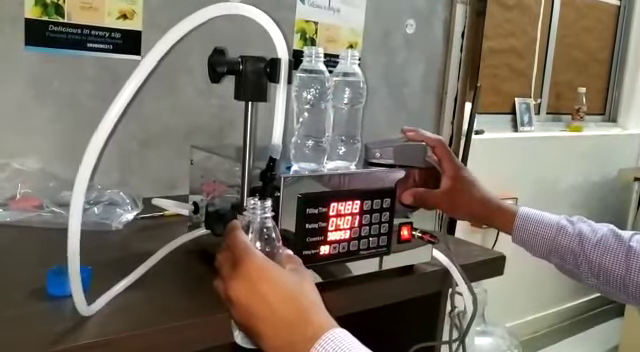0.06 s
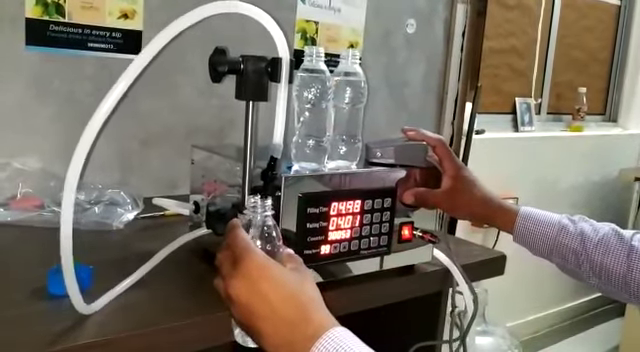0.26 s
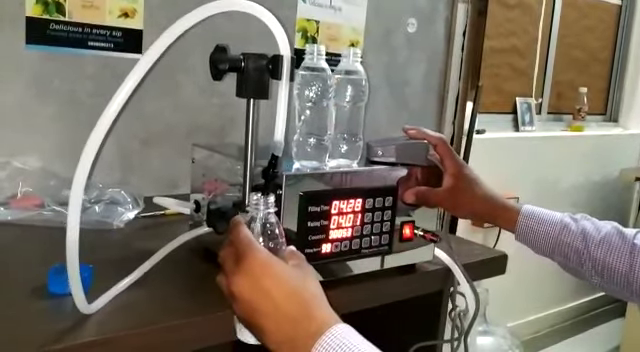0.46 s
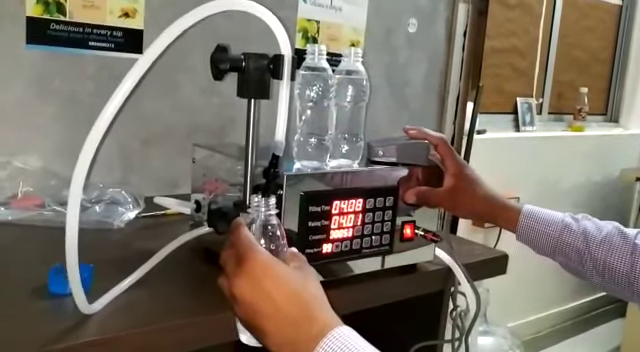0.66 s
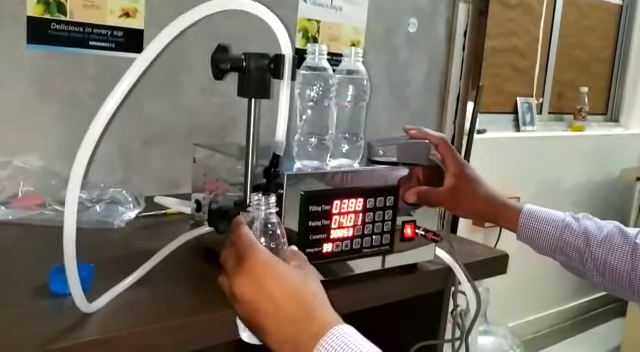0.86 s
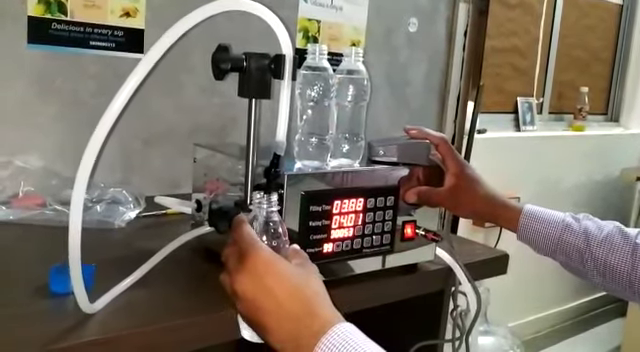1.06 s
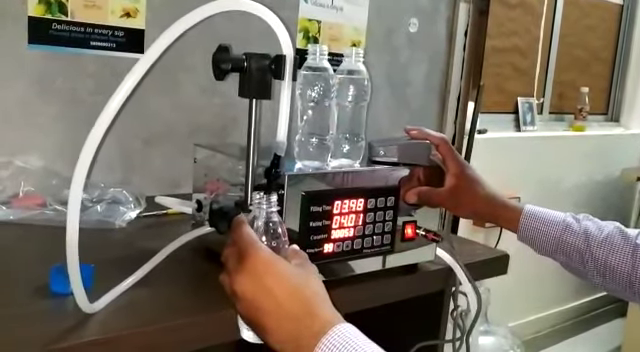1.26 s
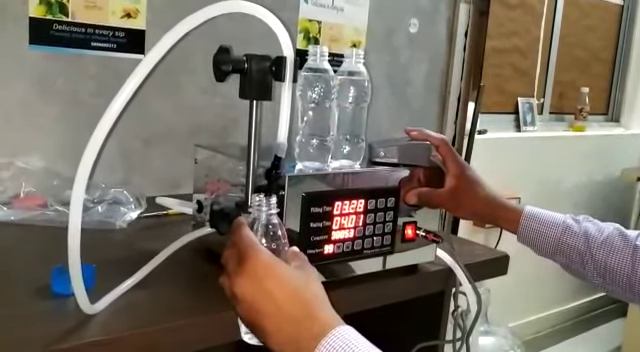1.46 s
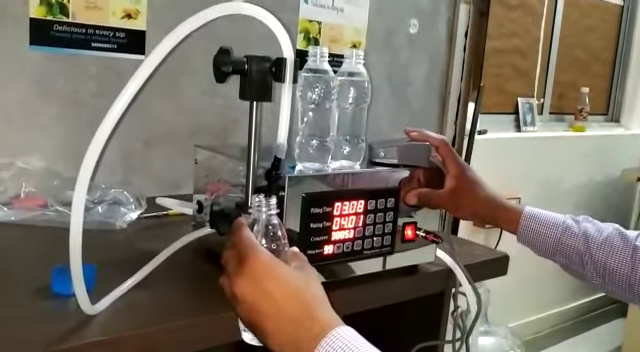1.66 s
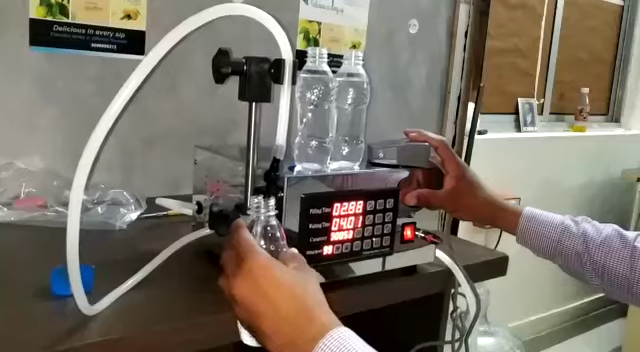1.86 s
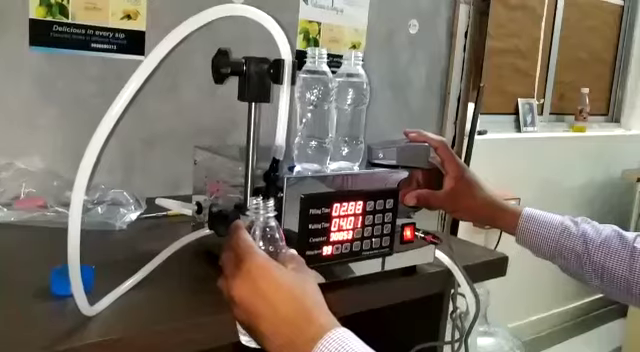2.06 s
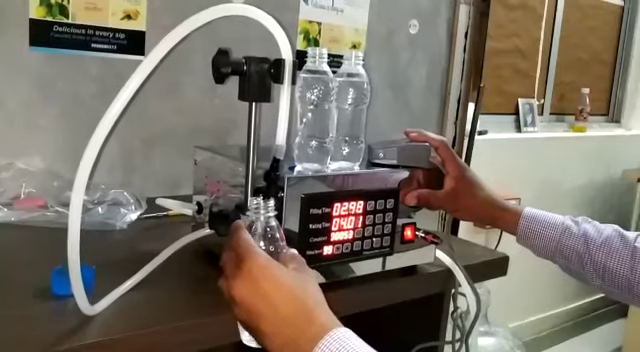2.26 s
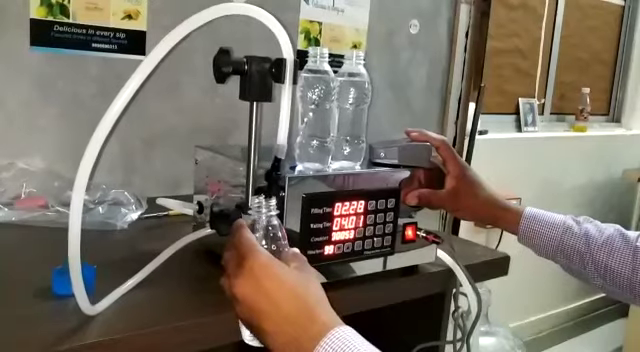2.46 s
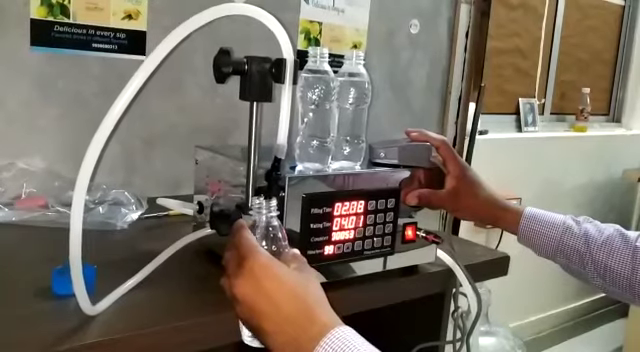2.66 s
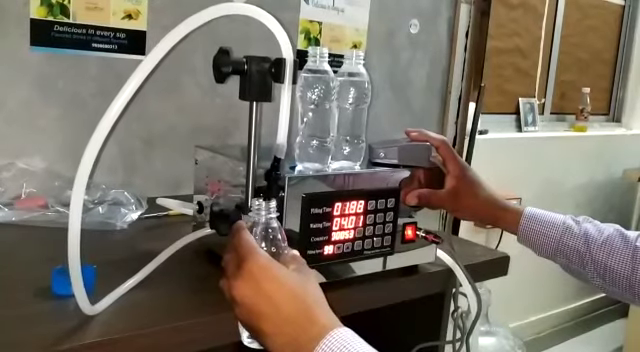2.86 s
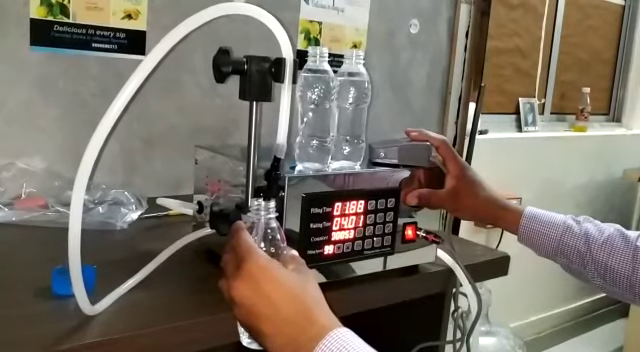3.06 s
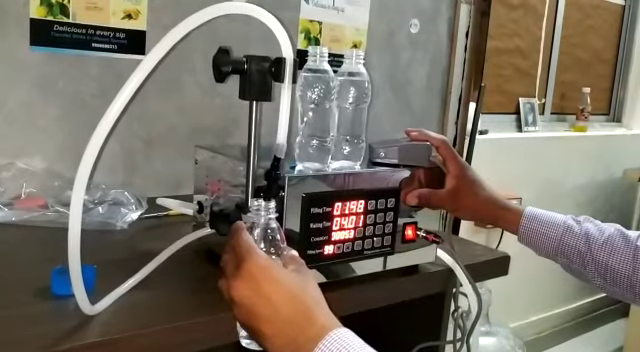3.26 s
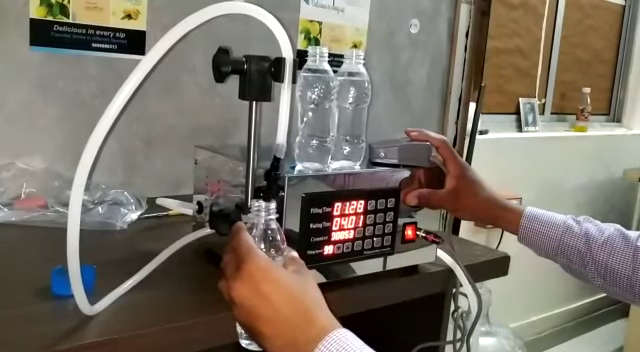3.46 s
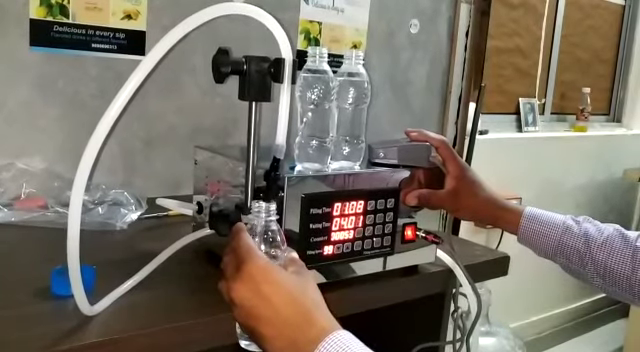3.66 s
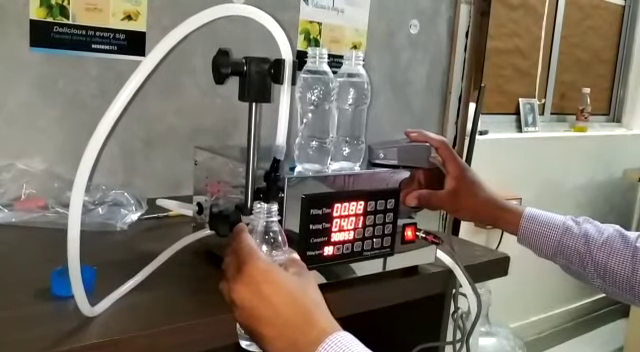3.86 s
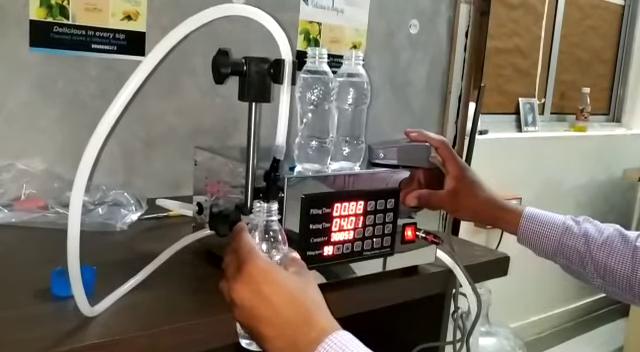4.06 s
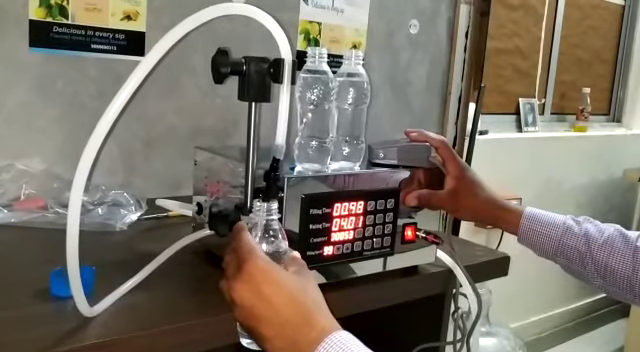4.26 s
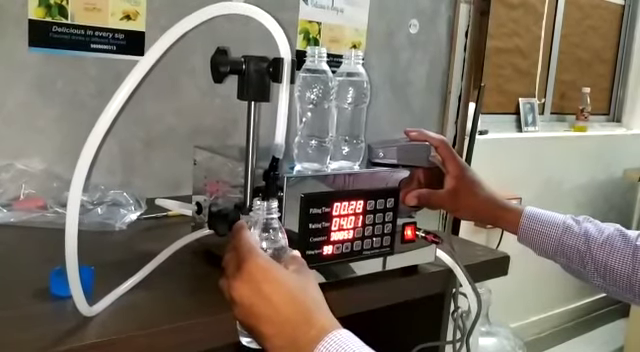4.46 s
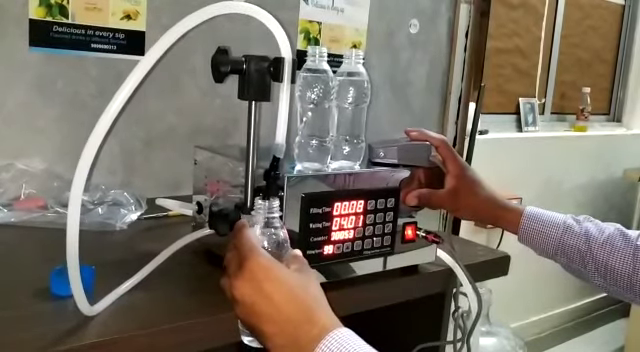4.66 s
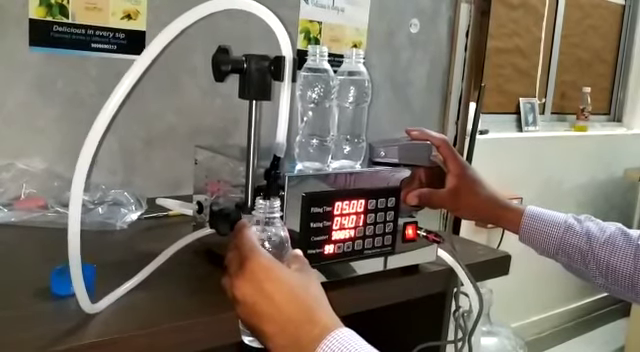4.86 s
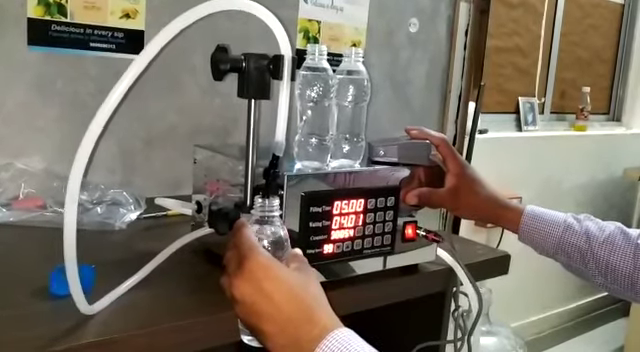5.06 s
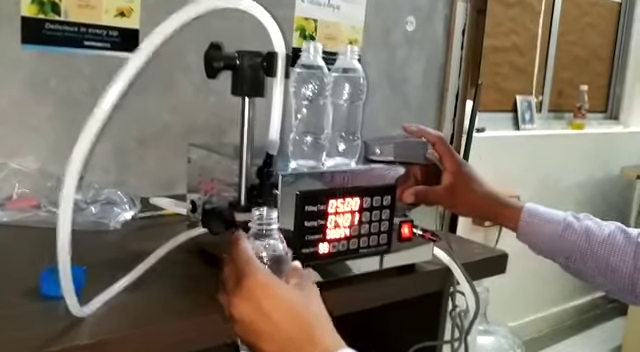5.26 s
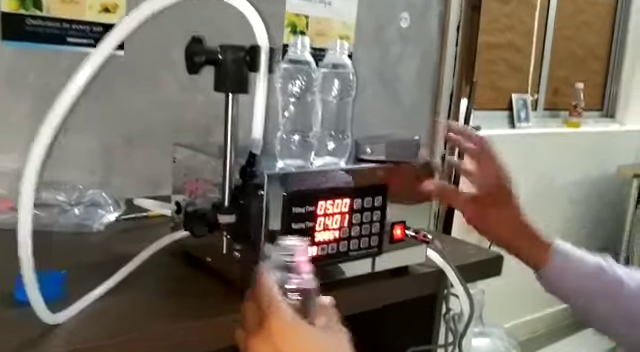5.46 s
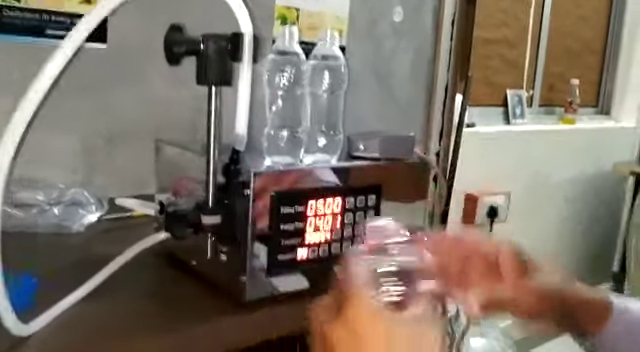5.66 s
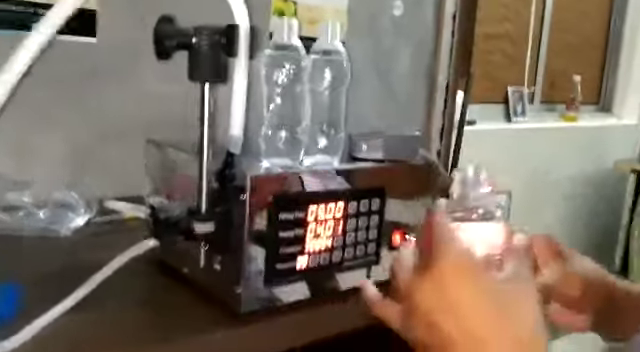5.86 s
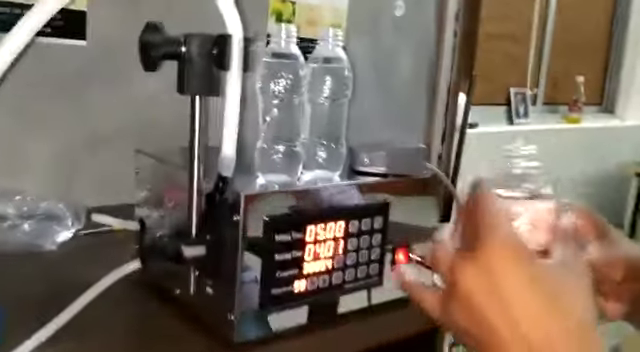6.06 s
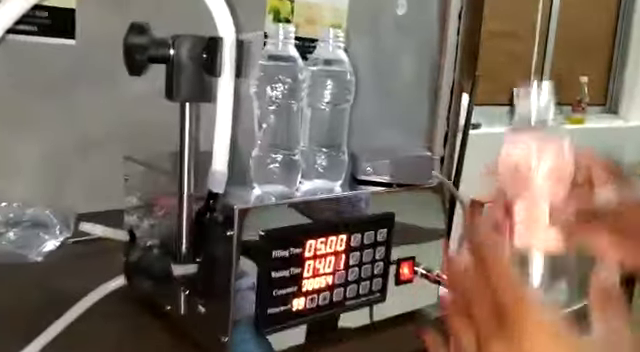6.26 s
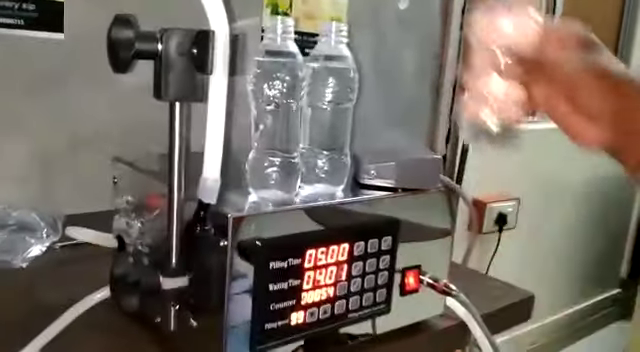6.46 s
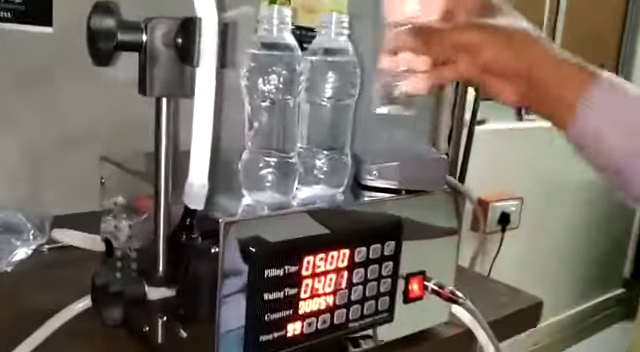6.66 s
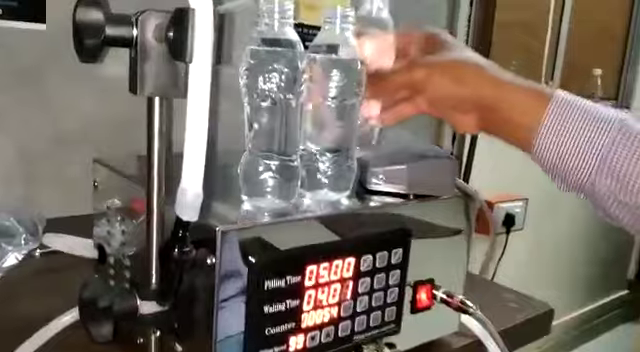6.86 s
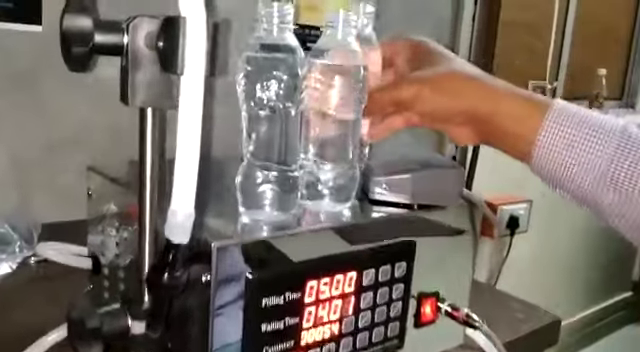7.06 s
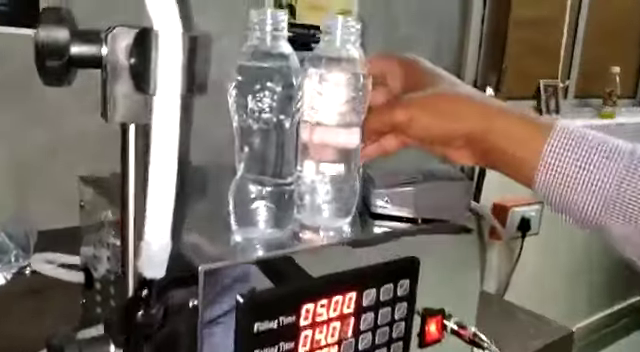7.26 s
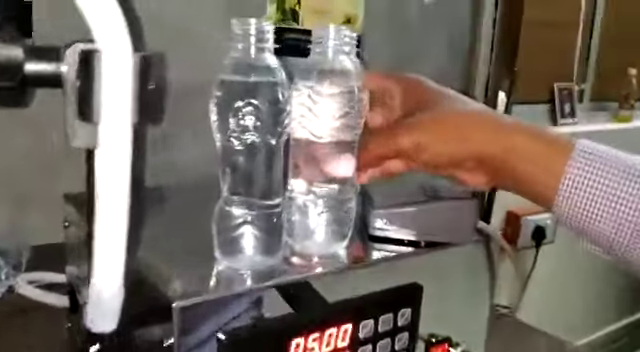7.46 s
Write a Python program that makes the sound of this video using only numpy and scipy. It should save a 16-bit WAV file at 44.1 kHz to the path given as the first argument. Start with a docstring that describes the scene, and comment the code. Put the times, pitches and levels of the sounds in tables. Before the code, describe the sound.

A benchtop filling machine starts at once with a brief shudder in a small hard room. Its pump motor holds a steady buzzing hum, with a bright hiss and a thin electronic whine. Liquid patters into a plastic bottle, the fine drops clearest in the first two seconds, while a faint hollow gurgle climbs in pitch as the bottle fills. At about 4.9 seconds the pump surges slightly and cuts out, the case shudders and the last drops fall. A low room drone and soft hiss remain, with faint handling of the bottle. At 6.9 seconds the full bottle taps the steel case with a sharp plastic snap. Around 7.3 seconds it is set down with a quick cluster of knocks, a short metallic ring and a dull thud from the bench. The hand-held microphone rumbles and bumps softly around 2.5 to 2.8, 5.5 and 6 seconds.

```python
"""A small hard room, where a benchtop filling machine pumps liquid into a plastic bottle for five seconds.
The motor hums and buzzes at harmonics of its shaft rate, with a hiss and a thin electronic whine.
Drops patter, and the bottle's air resonance climbs as the air volume shrinks. The pump stops; the full
bottle is tapped against the steel case and set down on it, exciting the modes of case and bench.
Beneath it all lie the drone of the room and the rumble of a hand-held microphone."""
import sys
import numpy as np
from scipy import signal
from scipy.fft import rfft, irfft
from scipy.io import wavfile

SR = 44100
rng = np.random.default_rng(int(sys.argv[2]) if len(sys.argv) > 2 else 0)


def int16_out(signal):
    """Quantize to a 16-bit WAV file."""
    q = np.round(np.clip(np.atleast_2d(signal).T, -1, 1) * 32767)
    wavfile.write(sys.argv[1], SR, q.astype(np.int16))


N = 331632
TIME = np.arange(N) / SR
STOP_S, FLOW_END_S = 4.87, 4.92  # the drive cuts out, then the stream dries up

# The motor's run. Each row: time in seconds, shaft turns per second, running level in dB.
MOTOR_RUN = [(0, 50, -16), (.07, 57, -12), (.13, 59.25, -1), (.45, 59.15, 0), (1.3, 59.2, 0),
             (2.8, 59.27, 0), (4.68, 59.3, 0), (4.83, 59.1, -1), (4.9, 58.9, -7), (5.05, 58.8, -13),
             (5.25, 58, -45), (5.3, 58, -100)]
# Low shaft harmonics. Each row: multiple of the shaft rate, level in dB, growth in dB per second.
HUM_ORDERS = [(1, -55, 0), (2, -46.5, -0.34), (3, -39.5, -0.88), (5, -49.5, 0), (6, -46, 0.3)]
# The motor's stepping tones. Each row: multiple of the shaft rate, start in seconds, start of the fade
# in seconds, level in dB, growth in dB per second, fade in dB per second, sway in dB.
STEP_TONES = [(4, 0.07, 4.85, -36, 0.23, 53, 0.4), (8, 0.073, 4.63, -40.5, 1.11, 53, 0.8)]
# Shaft harmonics that the sheet metal radiates well. Each row: frequency in Hz, level in dB.
PANEL_TONES = [(651.4, -58.5), (710.6, -53), (769.8, -55.5), (829.0, -51), (888.2, -53), (947.5, -52.5),
               (1303, -64), (1421, -57.5), (1480, -60.5), (1599, -57), (1776, -59), (1836, -60.5),
               (2013, -64), (2250, -58), (3203, -66.5), (3316, -64), (3381, -67), (4210, -65.5),
               (4328, -64.5), (4447, -72), (4506, -67.5), (5098, -66.5), (5868, -66), (5927, -68),
               (5986, -64.5), (6815, -63)]
# Envelope of the weaker shaft harmonics. Each row: frequency in Hz, relative level in dB.
COMB_SPECTRUM = [(550, -14), (1100, -4), (1500, 7), (2200, -10), (2700, -7), (3300, -10.5), (4400, -1.5),
                 (5200, -5), (5900, -4), (7200, -9), (8200, -18)]
# Hiss of the drive. Each row: frequency in Hz, relative spectral density in dB.
HISS_SPECTRUM = [(2000, 1.5), (3300, 1), (4400, 2.5), (5000, 1.5), (5900, 3.5), (8400, 1.5), (10800, 4),
                 (12000, 0.5), (13400, 5.5), (14200, 0), (14950, 8.5), (15600, -5.5)]
# Churn of the pump head and tube. Each row: frequency in Hz, relative spectral density in dB.
CHURN_SPECTRUM = [(100, -7), (220, -4.5), (400, -2.5), (600, -7.5), (900, -6.5), (1150, -14), (2200, -12.5),
                  (2800, -25.5), (5000, -35)]
# Whine of the electronics. Each row: time in seconds, rms level in dB.
WHINE_LEVEL = [(0, -65), (.45, -57), (1.8, -61.5), (2.05, -69), (2.33, -66), (2.45, -58.5), (4.8, -56)]
# Case shudders. Each row: centre time in seconds, peak level in dB, frequency in Hz, length in seconds.
CASE_SHUDDERS = [(.055, -29.5, 284.5, .11), (4.859, -33.5, 260.5, .09), (4.956, -36, 281, 0.14),
                 (4.99, -39, 177.4, .28), (5.061, -40.5, 113, .3)]
# How strongly the stream stirs the bottle's air. Each row: time in seconds, level in dB.
GURGLE_LEVEL = [(0, -42), (.6, -55), (2.0, -58), (2.9, -46.5), (3.6, -45), (4.0, -49.5), (4.33, -45),
                (4.6, -52), (4.85, -51)]
# The larger drops. Each row: start in seconds, level in dB, centre frequency in Hz.
LARGE_DROPS = [(.197, -37, 10500), (.405, -37, 5400), (.425, -41, 4630), (.538, -35, 9400),
               (0.819, -35, 5960), (.84, -34, 10000), (.93, -33, 10500), (1.14, -39, 3780),
               (1.262, -39.5, 3700), (1.641, -30, 10300), (2.091, -38, 6030), (2.145, -38, 4800),
               (2.243, -35, 10900), (3.51, -36, 10200), (4.359, -34, 12530), (4.825, -39.5, 10800),
               (4.874, -28, 11200), (4.88, -34, 8360), (4.92, -37, 1440), (4.978, -41.5, 4740),
               (4.981, -42, 10500)]
# The bottle is handled, then meets steel. Each row: start in seconds, then gains in dB of the plastic
# snap, the body, the case ring and the bench thud.
BOTTLE_KNOCKS = [(5.805, -29, -60, -70, -70), (6.352, -35, -60, -70, -65), (6.9275, -3.5, -2.5, -13, -49),
                 (7.103, -32, -42, -44, -40), (7.2948, -19, -7, -6.5, -37), (7.3008, -21, -15, -17, -45),
                 (7.307, -18, -6, -13, -50), (7.327, -25, -19, -23, -28), (7.341, -30, -22, -22, -50),
                 (7.3657, -50, -26, -28, -23), (7.467, -41, -41, -45, -35)]
# Bright snap of the plastic. Each row: frequency in Hz, relative level in dB.
SNAP_SPECTRUM = [(800, -5), (2800, -9), (3500, -7), (4300, 2), (5000, -0.5), (5700, -4), (6500, -4),
                 (8500, -4), (11500, 1), (13000, -2), (14800, 1.5), (16000, 1)]
# Dull body of a knock. Each row: frequency in Hz, relative level in dB.
BODY_SPECTRUM = [(80, -24), (250, 10.5), (450, -2), (650, 4), (850, 0), (1700, -5.5), (2300, -8),
                 (3200, -19.5), (8000, -28)]
# Modes of the steel case. Each row: frequency in Hz, level in dB, 60 dB decay time in seconds.
CASE_MODES = [(266, -23, 0.19), (432, -31, 0.16), (844, -38, 0.31), (1222, -31, 0.11), (1660, -35, 0.11),
              (2200, -41, .15)]
# Modes of the bench. Each row: frequency in Hz, level in dB, 60 dB decay time in seconds.
BENCH_MODES = [(80, -4, 0.29), (135, -7, 0.065), (201, -6, 0.13)]
# Reverberation of the room. Each row: frequency in Hz, 60 dB decay time in seconds.
REVERB_TIMES = [(200, 0.69), (1000, 0.36), (4000, 0.52), (9000, 0.58), (15000, 0.2)]
# Shifts of the grip on the microphone. Each row: start in seconds, length in seconds, relative level in dB.
GRIP_SHIFTS = [(0, .14, -40), (2.51, 0.33, -33), (5.24, .26, -43), (5.94, .5, -39), (6.58, 0.6, -41),
               (7.32, .2, -38)]
# Soft bumps on the microphone. Each row: start in seconds, peak level in dB.
HAND_BUMPS = [(2.53, -27), (2.825, -28), (5.456, -24), (6.022, -26)]
# Rumble of the hand. Each row: frequency in Hz, relative spectral density in dB.
RUMBLE_SPECTRUM = [(10, -21), (30, 5), (60, 1), (90, -5.5), (130, -5), (250, -26), (600, -70)]
# Low drone of the room. Each row: frequency in Hz, relative spectral density in dB.
DRONE_SPECTRUM = [(50, -16), (85, -5), (141, -7.5), (157, -7.5), (178, 3.5), (200, -3), (233, -2.5),
                  (295, -5), (415, -0.5), (482, -9.5), (860, -8), (1100, -12.5), (1430, -39), (2420, -120)]
# Soft hiss of the room. Each row: frequency in Hz, relative spectral density in dB.
AIR_SPECTRUM = [(650, -30), (1100, 2.5), (1240, 7), (1600, 3.5), (1920, 3.5), (2420, 1), (2750, -4),
                (3500, -7.5), (4400, -9.5), (5600, -14), (8000, -16), (12000, -20), (15700, -26)]


def shaft_harmonic(angle, order, dispersion_rad=1.3):
    """Dispersion: the mounting gives each multiple of the shaft rate its own phase; rms 1."""
    return np.sqrt(2) * np.sin(order * angle + dispersion_rad * order ** 2)


def motor_hum(angle, sway_db=0.56, sway_hz=5.4):
    """Forced vibration at low harmonics of the shaft rate, swaying with the load."""
    tones = sum(amp(db + growth * TIME + sway_db * drift(sway_hz)) * shaft_harmonic(angle, order)
                for order, db, growth in HUM_ORDERS)
    return amp(curve(MOTOR_RUN, column=2)) * tones


def motor_steps(angle, attack_s=0.044, settle_s=1.4, sway_hz=5.4):
    """Periodic stepping forces give two tones, whose sway lessens as the flow steadies."""
    unsteadiness = 0.5 + np.exp(-TIME / settle_s)
    out = np.zeros(N)
    for order, start, end, db, growth, fade, sway_db in STEP_TONES:
        level_db = db + growth * TIME - fade * since(end) + sway_db * unsteadiness * drift(sway_hz)
        out += ramp(start, attack_s) * amp(level_db) * shaft_harmonic(angle, order)
    return out


def panel_buzz(angle, tones_db=-1, comb_db=-54, scatter_db=3, flutter=0.17):
    """Radiation from sheet metal: some high shaft harmonics stand out of a fine, uneven comb."""
    shaft_hz = np.median(curve(MOTOR_RUN))
    strong = [round(hz / shaft_hz) for hz, _ in PANEL_TONES]
    tones = np.zeros(N)
    for order, (_, db) in zip(strong, PANEL_TONES):
        gain = np.sqrt(2) * amp(db + tones_db) * (1 + flutter * drift(3.4))
        tones += gain * np.sin(order * angle + 2 * np.pi * rng.random())
    # the comb is the waveform of one shaft turn, repeated
    orders = np.arange(9, 138)
    strengths = np.zeros(2049)
    uneven_db = scatter_db * rng.standard_normal(len(orders))
    strengths[orders] = amp(at_hz(COMB_SPECTRUM, orders * shaft_hz) + uneven_db)
    strengths[strong] = 0
    one_turn = unit(irfft(strengths * np.exp(2j * np.pi * rng.random(len(strengths)))))
    comb = np.interp(angle / (2 * np.pi) % 1, np.linspace(0, 1, len(one_turn)), one_turn)
    return amp(curve(MOTOR_RUN, column=2)) * (tones + amp(comb_db) * comb)


def pump_effort(ease_db_per_s=0.31, surge_db=4, surge_s=0.08, cut_db=9, run_down_db_per_s=130):
    """Gain under load: the pump eases slowly, labours just before it stops, then runs down."""
    surge = surge_db * np.exp(np.minimum(TIME - STOP_S, 0) / surge_s)
    stopping = cut_db * ramp(STOP_S, 0.028) + run_down_db_per_s * since(STOP_S)
    return amp(surge - stopping - ease_db_per_s * TIME)


def pump_noise(angle, hiss_db=-45.5, churn_db=-43.5, throb=0.2, flicker_db=1.0):
    """Amplitude modulation: the drive's hiss throbs once a turn, over the churn of the pump head."""
    hiss = amp(hiss_db + flicker_db * drift(45)) * noise(HISS_SPECTRUM) * (1 + throb * np.cos(angle))
    churn = amp(churn_db) * noise(CHURN_SPECTRUM)
    return pump_effort() * (hiss + churn)


def electronic_whine(hz=7784, wander_rad=0.75, fade_s=0.056):
    """Phase modulation slightly blurs the thin tone of the motor's electronics."""
    powered = np.clip((STOP_S - TIME) / fade_s, 0, 1)
    phase = 2 * np.pi * hz * TIME + wander_rad * drift(8.8)
    return powered * np.sqrt(2) * amp(curve(WHINE_LEVEL)) * np.sin(phase)


def case_shudders():
    """Resonance: modes of the case swell briefly as the motor starts and stops."""
    out = np.zeros(N)
    for centre, db, hz, length in CASE_SHUDDERS:
        t = np.arange(0, length, 1 / SR)
        add(out, centre - length / 2, amp(db) * np.hanning(len(t)) * np.sin(2 * np.pi * hz * t))
    return out


def flow(fade_db_per_s=190):
    """Gain of the stream: steady, then an exponential decay just after the pump stops."""
    return amp(-fade_db_per_s * since(FLOW_END_S))


def bottle_air(empty_hz=364, brim_s=5.26, width_hz=85, gurgle_db=3):
    """Helmholtz resonance: the stream stirs the bottle's air; pitch goes as one over root volume."""
    air_left = 1 - np.minimum(TIME, FLOW_END_S) / brim_s
    carrier = np.exp(2j * np.pi * np.cumsum(empty_hz / np.sqrt(air_left)) / SR)
    pole = np.exp(-np.pi * width_hz / SR)
    stirring = rng.standard_normal(N) * amp(gurgle_db * drift(14))
    # shift down, low-pass, shift back: a resonator that follows the note
    note = (carrier * signal.lfilter([1], np.poly([pole, pole]), stirring / carrier)).real
    return flow() * amp(curve(GURGLE_LEVEL)) * unit(note)


def splash(hz, decay_cycles=17):
    """A drop's impact: a band of noise around hz, decaying exponentially."""
    t = np.arange(SR // 50) / SR
    band = [(hz / 2, -20), (hz, 0), (hz * 2, -20), (hz * 4, -45)]
    return np.exp(-t * hz / decay_cycles) * colour(rng.standard_normal(len(t)), band)


def stream_patter(drops_per_s=220, spread_db=3, pitches=24, spatter_db=-60.5, bare_db=7.5, bare_s=1.7):
    """Shot noise: fine droplets strike plastic and liquid at random, among some larger drops."""
    sizes = amp(spread_db * np.minimum(rng.exponential(1, N), 4))
    impacts = sizes * (rng.random(N) < drops_per_s / SR)
    pitch_index = rng.integers(0, pitches, N)
    spatter = sum(signal.oaconvolve(impacts * (pitch_index == k), splash(hz))[:N]
                  for k, hz in enumerate(np.geomspace(3600, 14500, pitches)))
    boost_db = bare_db * np.exp(-(TIME / bare_s) ** 2)  # louder until liquid covers the bottom
    out = flow() * amp(spatter_db + boost_db) * unit(spatter)
    for start, db, hz in LARGE_DROPS:
        add(out, start, amp(db) * splash(hz))
    return reverberate(out, wet_db=-3)


def bottle_knocks():
    """Impact excitation: the plastic snaps, the case rings, the bottle's weight thuds into the bench."""
    t, out = np.arange(SR // 2) / SR, np.zeros(N)
    for start, snap_db, body_db, case_db, thud_db in BOTTLE_KNOCKS:
        snap = amp(snap_db) * contact(SNAP_SPECTRUM, decay_s=0.0033, wet_db=-4.5)
        body = amp(body_db) * contact(BODY_SPECTRUM, decay_s=0.016, wet_db=6)
        case = amp(case_db) * ring(CASE_MODES, t)
        thud = amp(thud_db) * ring(BENCH_MODES, t)
        add(out, start, snap + body + case + thud)
    return out


def contact(spectrum, decay_s, wet_db):
    """A brief contact is broadband: a crack and its echoes, filtered together; energy 1."""
    t = np.arange(SR // 2) / SR
    crack = rng.standard_normal(len(t)) * np.exp(-t / decay_s)
    echoing = crack / np.linalg.norm(crack) + amp(wet_db) * reflections()
    sound = colour(np.pad(echoing, (0, len(t))), spectrum)[:len(t)]
    return sound / np.linalg.norm(sound)


def ring(modes, t):
    """Free vibration: a sum of damped modes."""
    return sum(amp(db - 60 * t / t60) * np.sin(2 * np.pi * hz * t) for hz, db, t60 in modes)


def reflections(early_gain=2, early_s=0.0098):
    """Impulse response: echoes from bench and wall, then a tail whose top treble dies first; energy 1."""
    hz, t, bands = signal.stft(rng.standard_normal(SR // 2), SR, nperseg=256)
    decay = amp(-60 * t / at_hz(REVERB_TIMES, hz)[:, None]) + early_gain * np.exp(-t / early_s)
    tail = signal.istft(bands * decay, SR, nperseg=256)[1][:SR // 2]
    tail[:SR // 500] = 0  # the first echo takes 2 ms
    return tail / np.linalg.norm(tail)


def reverberate(x, wet_db):
    """Convolution adds the room's reflections to the direct sound."""
    return x + amp(wet_db) * signal.fftconvolve(x, reflections())[:N]


def handling(rumble_db=-52, lumps_db=2, rise_s=0.025, fall_s=0.094, bump_hz=55.6, bump_decay_s=0.0062):
    """Structure-borne sound of the hand: a lumpy rumble that swells as the grip shifts, and soft bumps."""
    gain = amp(rumble_db)
    for start, length, db in GRIP_SHIFTS:
        gain = gain + amp(db) / 2 * ramp(start, rise_s) * np.exp(-since(start + length) / fall_s)
    out = gain * unit(amp(lumps_db * drift(7.6)) * noise(RUMBLE_SPECTRUM))
    t = np.arange(SR // 10) / SR
    bump = np.sin(2 * np.pi * bump_hz * t) * np.exp(-t / bump_decay_s)
    for start, db in HAND_BUMPS:
        add(out, start, amp(db) * bump / bump.max())
    return out


def room_tone(drone_db=-39.5, air_db=-47.0, swell_db=0.7):
    """Ambient noise: a low drone and a soft, gently swelling hiss."""
    drone = amp(drone_db) * noise(DRONE_SPECTRUM)
    return drone + amp(air_db + swell_db * drift(2.5)) * noise(AIR_SPECTRUM)


def amp(db):
    """Decibels to amplitude ratio."""
    return 10 ** (np.asarray(db) / 20)


def unit(x):
    """Normalisation to rms 1."""
    return x / np.sqrt(np.mean(x ** 2) + 1e-20)


def since(start):
    """Seconds elapsed since start, zero before it."""
    return np.maximum(TIME - start, 0)


def ramp(start, rise_s):
    """Linear rise from 0 to 1."""
    return np.minimum(since(start) / rise_s, 1)


def curve(rows, column=1):
    """Linear interpolation of a time table at every sample."""
    rows = np.array(rows)
    return np.interp(TIME, rows[:, 0], rows[:, column])


def at_hz(rows, hz):
    """Interpolation on a log-frequency axis."""
    frequencies, values = np.transpose(rows)
    return np.interp(np.log(hz + 1), np.log(frequencies + 1), values)


def colour(x, spectrum):
    """Filtering by multiplication of spectra; rms 1."""
    gain = amp(at_hz(spectrum, np.fft.rfftfreq(len(x), 1 / SR)))
    return unit(irfft(rfft(x) * gain, len(x)))


def noise(spectrum):
    """Stationary noise of a given spectrum; rms 1."""
    return colour(rng.standard_normal(N), spectrum)


def drift(rate_hz):
    """Slow fluctuation: noise low-passed at rate_hz; rms 1."""
    rolloff = 1 + (np.fft.rfftfreq(N, 1 / SR) / rate_hz) ** 4
    return unit(irfft(rfft(rng.standard_normal(N)) / rolloff, N))


def add(mix, start, sound):
    """Superposes a sound on the mix at start, in seconds."""
    part = mix[max(round(start * SR), 0):][:len(sound)]
    part += sound[:len(part)]


def scene():
    """Superposition of machine, bottle and room at one hand-held microphone."""
    angle = 2 * np.pi * np.cumsum(curve(MOTOR_RUN)) / SR  # shaft angle in radians
    motor = motor_hum(angle) + motor_steps(angle) + panel_buzz(angle)
    machine = motor + pump_noise(angle) + electronic_whine() + case_shudders()
    bottle = bottle_air() + stream_patter() + bottle_knocks()
    return (machine + bottle + handling() + room_tone())[None]


def record(dry):
    """Band limiting: a steep low-pass filter removes the highest treble."""
    low_pass = signal.firwin(1023, cutoff=15740, window=("kaiser", 9), fs=SR)
    return signal.oaconvolve(dry, low_pass[None], "same")


dry = scene()
out = record(dry)
int16_out(out)
```